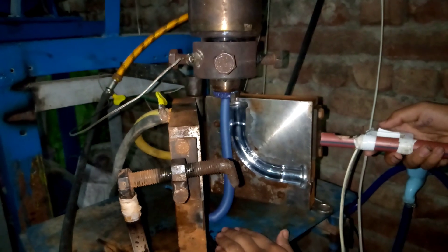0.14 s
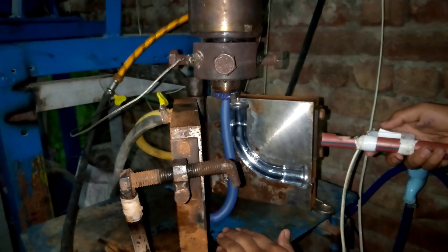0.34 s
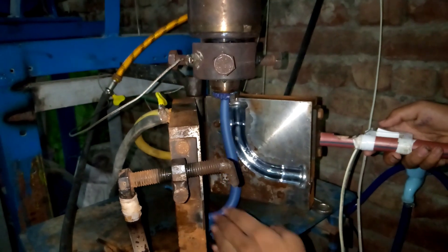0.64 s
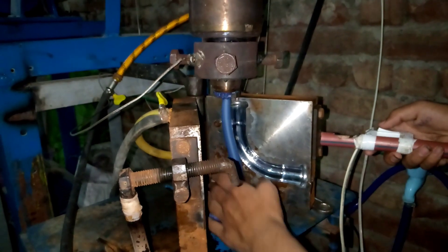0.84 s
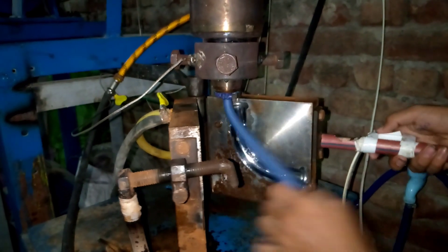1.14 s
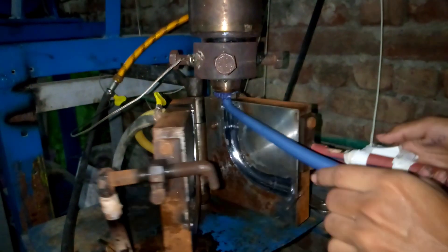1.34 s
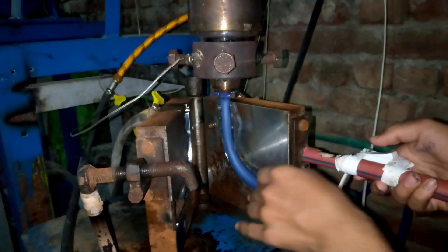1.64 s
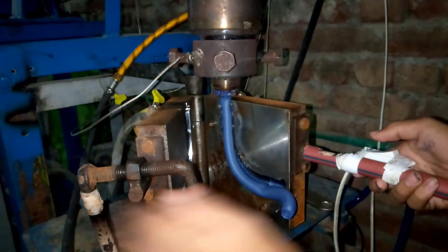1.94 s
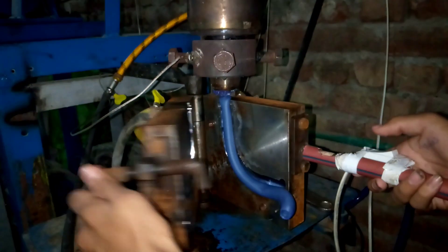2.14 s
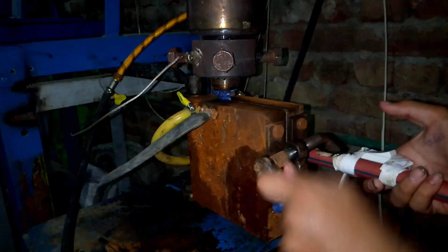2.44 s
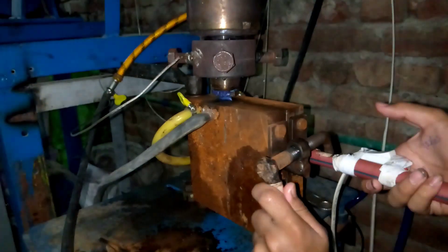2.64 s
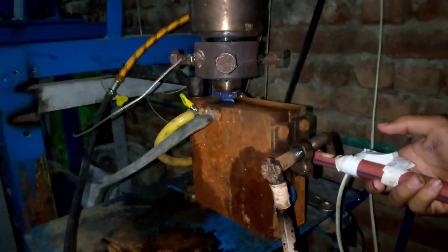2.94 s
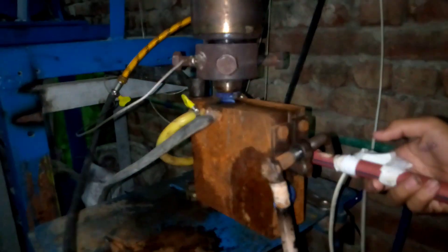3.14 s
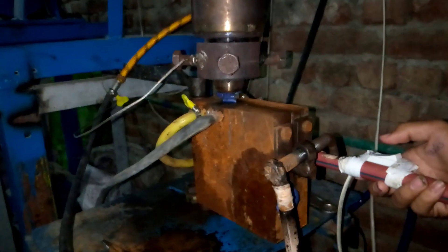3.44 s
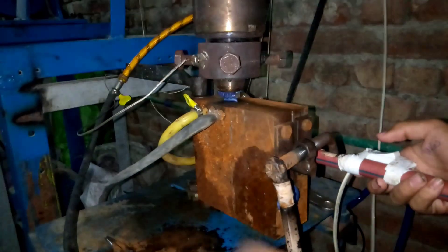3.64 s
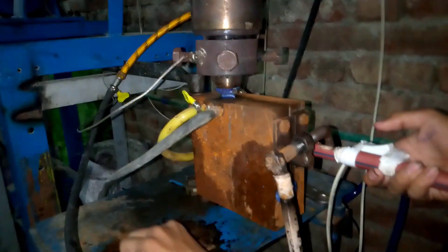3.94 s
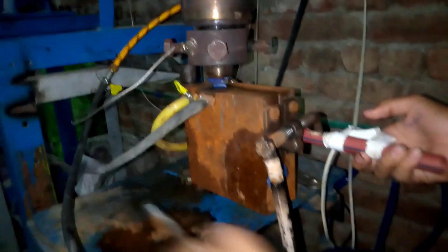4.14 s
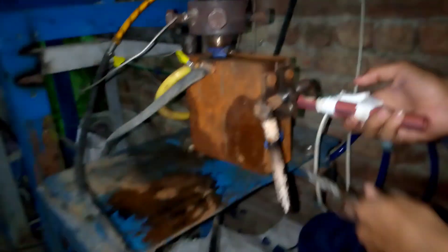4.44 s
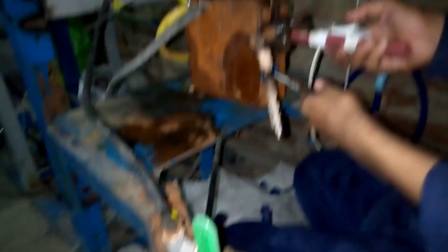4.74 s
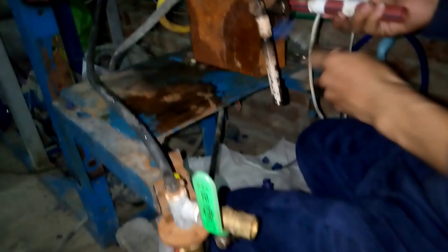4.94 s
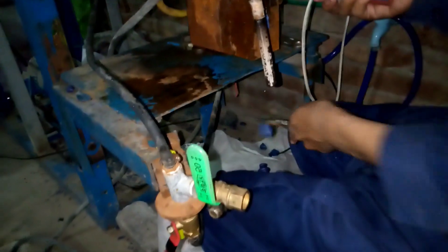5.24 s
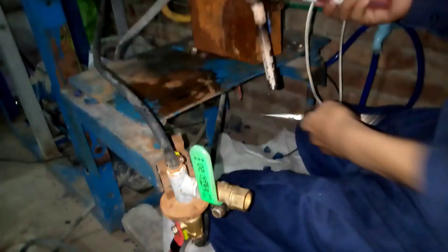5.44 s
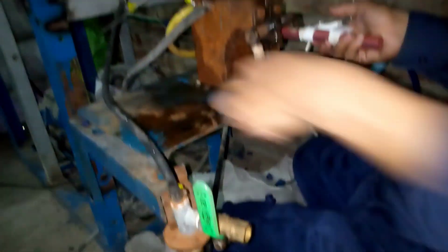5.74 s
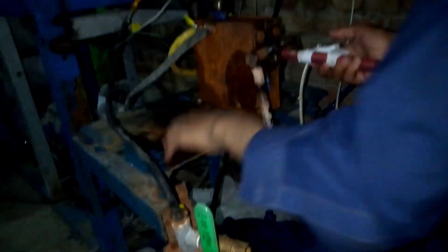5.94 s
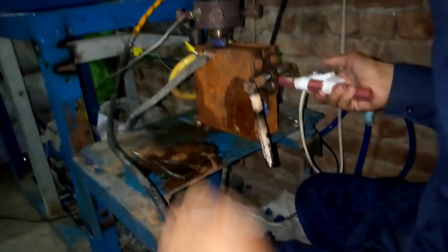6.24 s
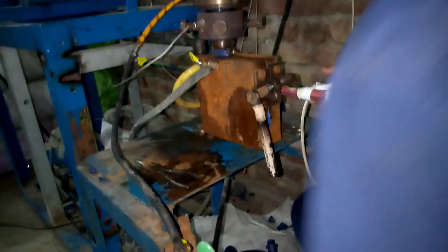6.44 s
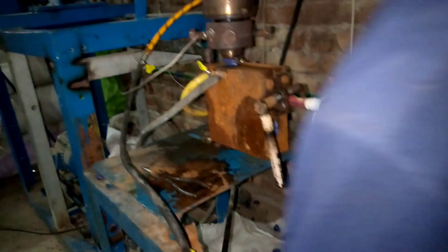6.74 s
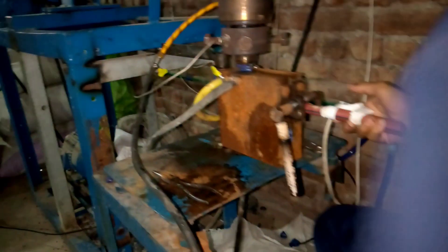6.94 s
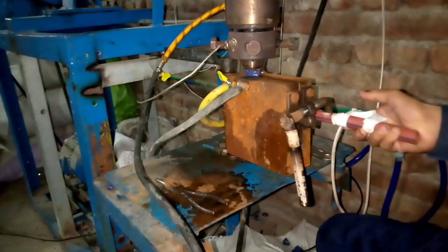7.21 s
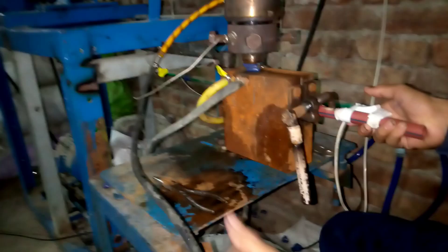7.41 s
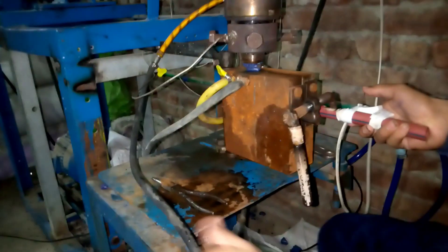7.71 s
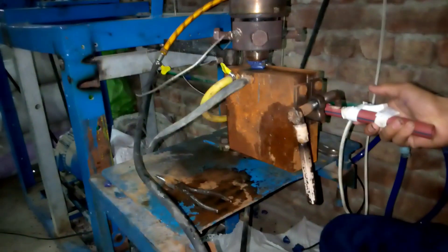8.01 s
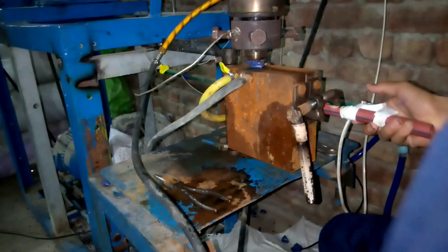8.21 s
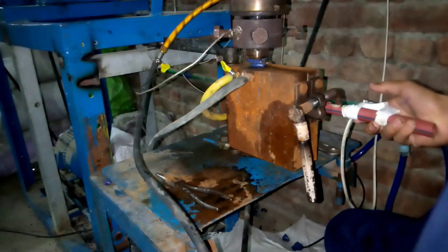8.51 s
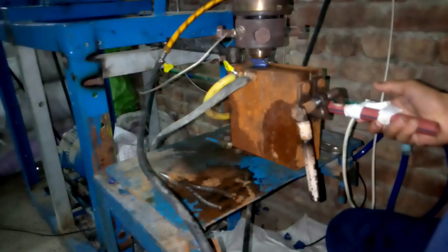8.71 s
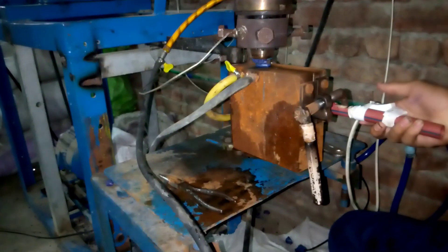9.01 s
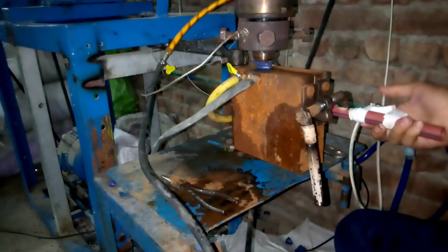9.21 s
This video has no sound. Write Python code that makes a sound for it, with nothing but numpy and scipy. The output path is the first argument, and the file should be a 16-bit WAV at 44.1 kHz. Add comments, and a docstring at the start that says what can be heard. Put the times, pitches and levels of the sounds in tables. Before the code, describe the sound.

Low machine hum and throb, a few clicks, then a sudden bright jet of pressurised air with metal clinks, weakening before one short blast.

```python
"""Compressed air blown into a mould

Compressed air is blown through a hand-held pipe into a closed mould in a small workshop.
A piston compressor (harmonic sum) throbs over a drone (shaped noise). Knocks and metal clinks are damped
sines, ticks are noise bursts. Three short leaks come before the valve opens; the jet is band-filtered noise
with shifting resonances. Moving air pushes the microphone, most of all in a late puff."""
import sys
import numpy as np
from scipy import signal
from scipy.fft import rfft, irfft
from scipy.io import wavfile
from scipy.ndimage import uniform_filter1d, minimum_filter1d

SR = 44100
rng = np.random.default_rng(int(sys.argv[2]) if len(sys.argv) > 2 else 0)


def elevation(decibels):
    """Turn decibel levels (scalar or array-like) into linear amplitude ratios."""
    levels = np.asarray(decibels, float)
    return 10 ** (levels / 20)


def dump_mix(stems):
    """Bounce the given channels to the path in sys.argv[1] as a 16-bit WAV at rate SR."""
    frames = np.atleast_2d(stems).T  # one column per channel
    limited = np.clip(frames, -1, 1)  # hard clip at full scale
    pcm = np.round(limited * 32767).astype(np.int16)
    wavfile.write(sys.argv[1], SR, pcm)


N = 413216


def evened(x):
    """Normalization: scales a signal to an rms of 1."""
    return x / np.sqrt(np.mean(x ** 2) + 1e-20)


def columns(rows):
    """Linear interpolation: joins the rows of a curve, one array of samples for each column after start_s."""
    s, *values = np.transpose(rows)
    return [np.interp(np.arange(N) / SR, s, v) for v in values]


def add(mix, s, sound):
    """Superposition: lays a sound into the mix at s seconds."""
    part = mix[round(s * SR):][:len(sound)]
    part += sound[:len(part)]


def split(x, edges_hz):
    """Complementary filtering: cuts x into soft-edged bands that sum to x."""
    hz = np.fft.rfftfreq(len(x), 1 / SR)
    below = [0] + [1 / (1 + (hz / edge) ** 12) for edge in edges_hz] + [1]
    spectrum = rfft(x)
    return [irfft(spectrum * (high - low), len(x)) for low, high in zip(below, below[1:])]


def noise(spectrum, patchy_db, ripple_db, flicker_db):
    """Random short-time spectra: brief patches, slow narrow ripple from reflections, flicker shared by all bins."""
    frames, hz = N // 256 + 5, np.fft.rfftfreq(1024, 1 / SR)
    real, imag, patches, ripple = rng.standard_normal((frames, 513, 4)).T
    # axis 0 is frequency, axis 1 is time
    patches = uniform_filter1d(uniform_filter1d(patches, size=10, axis=0), size=14, axis=1)
    ripple = uniform_filter1d(uniform_filter1d(ripple, size=3, axis=0), size=130, axis=1)
    flicker = uniform_filter1d(rng.standard_normal(frames), size=5)
    sway_db = patchy_db * evened(patches) + ripple_db * evened(ripple) + flicker_db * evened(flicker)
    curve_hz, curve_db = np.transpose(spectrum)
    colour_db = np.interp(np.log(hz + 1), np.log(curve_hz + 1), curve_db)[:, None]
    z = (real + 1j * imag) * elevation(colour_db + sway_db)
    return evened(signal.istft(z, nperseg=1024, noverlap=768)[1][:N])


def narrow_band(hz, width):
    """Frequency shifting: noise smoothed twice by a one-pole filter is moved up to the curve hz."""
    pole = np.exp(-np.pi * width / SR)
    z = rng.standard_normal(N) + 1j * rng.standard_normal(N)
    for _ in range(2):
        z = signal.lfilter([1], [1, -pole], z)
    carrier = np.exp(2j * np.pi * np.cumsum(hz * np.ones(N)) / SR)
    return evened((z * carrier).real)


def throb(orders, levels_db):
    """Harmonic series of the stroke rate: resonances delay partials, so each stroke rises fast and falls slowly."""
    # resonances of casing and pipes: centre_hz, width_hz
    casing = [(212, 48), (283, 33), (342.6, 6), (377, 33), (676.3, 6), (695.4, 6), (831, 33)]
    strokes_per_s = 17.31
    turns = strokes_per_s * np.arange(N) / SR
    lag_turns = -.026 + .000276 * orders  # higher partials come later in the turn
    delay_rad = sum(np.arctan(2 * (orders * strokes_per_s - hz) / width) for hz, width in casing)
    total = np.zeros(N)
    for order, db, lag, delay in zip(orders, levels_db, lag_turns, delay_rad):
        total += elevation(db) * np.cos(2 * np.pi * order * (turns - lag) - delay)
    return evened(total)


def shop():
    """Superposition of compressor throb and drone, crossfaded in level and colour as the microphone moves."""
    # compressor partials, relative levels: multiple of the stroke rate, first_db, later_db (microphone moved)
    partials = [(7, -66, -68), (8, -67, -70), (9, -67, -73), (10, -65, -80), (11, -57, -69), (12, -64, -70),
                (13, -57, -64), (14, -60, -68), (15, -54, -62), (16, -55, -61), (17, -61, -62),
                (18, -56, -64), (19, -54, -51), (20, -47, -51), (21, -53, -61), (22, -65, -73),
                (23, -68, -76), (25, -63, -74), (26, -66, -76), (31, -67, -74), (33, -66, -69),
                (34, -61, -69), (36, -66, -71), (37, -63, -66), (38, -54, -61), (39, -55, -54),
                (40, -56, -70), (41, -56, -65), (42, -80, -65), (43, -68, -69), (44, -60, -67),
                (45, -66, -73), (47, -65, -71), (48, -62, -70), (55, -59, -74), (57, -68, -72),
                (59, -64, -68), (61, -65, -77), (64, -65, -80), (75, -65, -76), (78, -68, -77),
                (81, -65, -77)]
    # drone spectrum: centre_hz, relative level_db
    drone_colour = [(20, -31), (60, -3.5), (110, -8.5), (220, -5), (340, -15.5), (480, -14), (700, -15),
                    (900, -14.5), (1400, -18), (1800, -20.5), (3300, -21.5), (6700, -20), (8100, -38.5),
                    (11000, -43.5), (13800, -47), (14600, -32), (15800, -42)]
    # bands in the drone: centre_hz, width_hz (each smoothing stage), level_db relative to the shaped noise
    drone_bands = [(2058, 205, -13), (2854, 43, -21.5), (4460, 370, -16), (996, 210, -18.5),
                   (1296, 94, -19)]
    # gains of bass, body and upper part in dB, at the first place and after the move
    first_gains_db = [-47, -44, -44]
    later_gains_db = [-45.5, -41, -40.5]
    # the microphone's move: start_s, end_s
    move_s = (3.64, 4.7)
    orders, first_db, later_db = np.transpose(partials)
    moved = np.interp(np.arange(N) / SR, move_s, [0, 1])
    pump = (1 - moved) * elevation(2.0) * throb(orders, first_db) + moved * elevation(2.5) * throb(orders, later_db)
    drone = noise(drone_colour, patchy_db=0.93, ripple_db=2.0, flicker_db=0.25)
    drone += sum(elevation(db) * narrow_band(hz, width) for hz, width, db in drone_bands)
    bands = split(pump + elevation(3.5 - 0.83 * moved) * drone, [260, 480])
    gains = zip(first_gains_db, later_gains_db, bands)
    return sum(elevation(first + (later - first) * moved) * band for first, later, band in gains)


def ticks():
    """Impact noise: dry broadband bursts in three bands with a common exponential decay."""
    # start_s, middle_db, core_db (hiss band), high_db (treble), t60_s
    bursts = [(1.058, -39, -32.5, -36, .08), (1.071, -40, -40, -55, 0.21), (1.104, -40, -37, -39, 0.041),
              (2.410, -31, -39, -62, 0.021), (2.4945, -48, -23, -54, 0.023), (3.163, -38, -44, -45, .03),
              (3.3052, -16, -5, -10, .008), (3.849, -40, -25, -16, 0.013), (5.943, -22, -11, -28, .05),
              (5.990, -15, 5, -20, 0.026)]
    out, t = np.zeros(N), np.arange(8192) / SR
    for s, middle_db, core_db, high_db, t60 in bursts:
        middle, core, high = map(evened, split(rng.standard_normal(len(t)), [1100, 4000, 7300])[1:])
        high = evened(high + 3 * split(high, [14000])[1])  # the microphone lifts the top band
        burst = elevation(middle_db) * middle + elevation(core_db) * core + elevation(high_db) * high
        add(out, s, burst * elevation(-60 * t / t60) * np.minimum(t / 0.0018, 1))
    return out


def knocks():
    """Damped oscillator: each thump or short knock, low or high, is one exponentially decaying sine."""
    # start_s, level_db (undamped amplitude), pitch_hz, t60_s
    knock_notes = [(1.060, -26.5, 840, .03), (1.066, -33, 225, 0.23), (1.077, -28, 343, 0.04),
                   (1.105, -23, 2150, 0.01), (1.105, -38, 245, 0.058), (2.409, -30, 1280, 0.018),
                   (3.413, -21, 290, .02), (3.345, -27, 250, 0.018), (5.091, -33, 220, .1),
                   (5.109, -26.5, 200, 0.13), (5.99, -16, 150, 0.018)]
    out, t = np.zeros(N), np.arange(8192) / SR
    for s, level_db, hz, t60 in knock_notes:
        add(out, s, elevation(level_db - 60 * t / t60) * np.sin(2 * np.pi * hz * t))
    return out


def clinks():
    """Modal ringing: struck metal sounds its damped modes; a held part rings shorter, a smaller one higher."""
    # modes of a freely ringing part: pitch_hz, relative level_db, t60_s
    modes = [(1766, -21, .3), (2751, -24, .1), (3400, -17, .07), (4269, -9, .18), (4942, 0, .3),
             (5400, -9, .15), (6492, -4, .05)]
    # start_s, level_db (added to the modes), share of the free ring time, pitch factor
    strikes = [(2.4946, -29, 0.1, .99), (5.946, -12, .6, 1.075), (5.9915, -6, 0.75, 1.0)]
    out, t = np.zeros(N), np.arange(SR // 3) / SR
    for s, level_db, free, pitch in strikes:
        ring = np.zeros(len(t))
        for hz, db, t60 in modes:
            ring += elevation(db - 60 * t / (t60 * free)) * np.sin(2 * np.pi * hz * pitch * t)
        add(out, s, elevation(level_db) * ring * np.minimum(t / .0012, 1))
    return out


def spurts():
    """Pressure release: each burst rises, sags while held and ends quickly; returns core and top-band levels."""
    # three leaks before the valve opens, then a late puff:
    # start_s, rise_s, hold_s, peak_db, top_db (top band above the peak)
    bursts = [(3.055, 0.01, 0.0028, -42.5, -2), (3.121, 0.018, 0.02, -41, -2),
              (3.159, 0.0073, .003, -36.5, -8), (7.516, 0.037, .1, -5.5, -2)]
    sag_db_per_s, release_s = 94, .015
    t, total = np.arange(N) / SR, np.zeros((2, N))
    for s, rise, hold, db, top_db in bursts:
        times = [0, rise, rise + hold, rise + hold + release_s]
        pressure = np.interp(t - s, times, [0, 1, elevation(-sag_db_per_s * hold), 0])
        total += pressure * elevation(np.array([[db], [db + top_db]]))
    return total


def whistles():
    """Resonance of pipe and gap: narrow noise bands, some steady and some swelling, drift slowly in pitch."""
    # steady bands: centre_hz, width_hz (each smoothing stage), level_db relative to the jet
    resting = [(3288, 130, -38), (4577, 650, -20), (5455, 420, -14.5), (5910, 380, -14.5), (6480, 280, -13)]
    # bands that stand out for a while: start_s, end_s, centre_hz, width_hz, level_db relative to the jet
    swells = [(3.123, 4.087, 6550, 222, 0), (3.9, 4.9, 6560, 350, -7), (4.2, 8.103, 4630, 453, -13),
              (3.7, 4.697, 5410, 450, -5.5), (4.4, 6.7, 3288, 199, -24.5), (4.654, 5.6, 5910, 300, -12.5),
              (6.055, 7.105, 5357, 300, -4.5), (8.103, 9.323, 4495, 596, -10), (8.6, 9.3, 5460, 300, -10)]
    fade_s, drift = 0.17, .005  # drift: standard deviation, as a share of the pitch, of the points 0.5 s apart
    t = np.arange(N) / SR

    def drifting(hz):
        """Slow frequency modulation along a random curve."""
        return hz * (1 + drift * np.interp(t, np.arange(0, 10, .5), rng.standard_normal(20)))

    out = sum(elevation(db) * narrow_band(drifting(hz), width) for hz, width, db in resting)
    for start, end, hz, width, db in swells:
        fade = np.clip(np.minimum(t - start, end - t) / fade_s, 0, 1)
        out += elevation(db) * fade * narrow_band(drifting(hz), width)
    return out


def jet():
    """Turbulence noise: hiss in five bands plus whistles, modulated by uneven flow; spurts add power to the hiss."""
    # the flow from the opening of the valve on: start_s, level_db
    flow = [(3.2035, -20), (3.218, -19), (3.228, -12), (3.28, -9), (3.8, -10.5), (4.05, -11.5),
            (4.4, -11.5), (5.45, -12), (5.72, -11), (6.04, -13), (6.2, -12.5), (7.02, -12.5), (7.12, -19.5),
            (7.41, -16), (7.62, -15), (7.68, -19.5), (7.74, -21), (7.85, -23), (7.95, -20), (8.1, -26),
            (8.17, -19), (9.27, -18.5), (9.31, -26.5)]
    # hiss spectrum: centre_hz, relative level_db
    hiss_colour = [(800, -36.5), (1500, -30), (2800, -24), (3800, -12.5), (4600, -1), (5400, 4),
                   (6700, 4.5), (7400, -9), (8200, -21.5), (10500, -19.5), (12000, -21.5), (13800, -17),
                   (14500, -8), (15200, -0.5), (15800, -14)]
    # bands beside the core: start_s, flank_db (lower flank), treble_db (middle treble), top_db
    side_bands = [(3.2035, -38, -33, -16), (3.235, -22.5, -9, -17), (3.3, -29.5, -16, -27),
                  (4.4, -32, -22.5, -21.5), (6.0, -30, -28.5, -18.5), (6.9, -36, -31.5, -16.5),
                  (7.8, -35, -35, -18), (9.37, -36.5, -33.5, -16.5)]
    # band just under the core: start_s, level_db relative to the jet
    shoulder_curve = [(3.2, -17), (3.9, -19), (4.6, -13.5), (6.0, -15), (7.0, -13), (9.37, -8)]
    # spurt levels relative to the spurt's core: flank_db, shoulder_db, treble_db
    spurt_bands_db = [-10.5, -7, -13]
    flowing = np.arange(N) / SR > flow[0][0]
    level = flowing * elevation(columns(flow)[0])
    flank, treble, top = (flowing * elevation(db) for db in columns(side_bands))
    steady = [flank, level * elevation(columns(shoulder_curve)[0]), level * elevation(-6.5), treble, top]
    burst, burst_top = spurts()
    burst_flank, burst_shoulder, burst_treble = (burst * elevation(db) for db in spurt_bands_db)
    bursts = [burst_flank, burst_shoulder, burst, burst_treble, burst_top]
    hiss = noise(hiss_colour, patchy_db=1.47, ripple_db=2.0, flicker_db=0.94)
    bands = map(evened, split(hiss, [3786, 5010, 7790, 13600]))
    broad = sum(np.hypot(a, b) * band for a, b, band in zip(steady, bursts, bands))
    flutter = evened(uniform_filter1d(rng.standard_normal(N), size=150))  # eddies of a few ms
    sputter = evened(uniform_filter1d(rng.standard_normal(N), size=1200))  # the flow is uneven over some 30 ms
    return elevation(0.23 * flutter + 0.64 * sputter) * (broad + level * whistles())


def buffets():
    """Heavily damped pressure pulse: moving air gives the microphone a sharp push and a slower swing back."""
    # start_s, level_db, pitch_hz, sign of the push
    pushes = [(3.306, -11.5, 450, 1), (7.544, -11, 300, -1), (7.552, -5, 300, 1), (7.555, -10, 109, -1),
              (7.568, -11, 160, -1), (7.578, -7.5, 109, -1)]
    out, t = np.zeros(N), np.arange(2000) / SR
    for s, level_db, hz, sign in pushes:
        push = np.cos(2 * np.pi * hz * t) * np.exp(-2.5 * hz * t) * np.minimum(t / 0.0003, 1)
        add(out, s, sign * elevation(level_db) * push)
    return out


def squeezed(x):
    """Dynamic compression: gain looks ahead, sinks above a knee, holds briefly and recovers at a steady rate."""
    knee_db, squeeze, recovery_db_per_s = -25, .58, 300  # squeeze: dB of gain lost per dB above the knee
    ahead_s, hold_s = 0.011, 0.029
    power_db = 10 * np.log10(abs(uniform_filter1d((x ** 2).mean(0), size=700)) + 1e-12)
    ahead, span = round(ahead_s * SR), round((ahead_s + hold_s) * SR)
    # running maximum, shifted to reach from the hold time back to the look-ahead
    padded_db = np.pad(power_db, span, "edge")
    held_db = -minimum_filter1d(-padded_db, size=span)[span + ahead - span // 2:][:N]
    fall_db = np.arange(N) * recovery_db_per_s / SR
    recovering_db = np.maximum.accumulate(held_db + fall_db) - fall_db
    over_db = np.maximum(recovering_db - knee_db, 0)
    return x * elevation(-squeeze * uniform_filter1d(over_db, size=300))


def scene():
    """Superposition: all sources reach one microphone, copied to both channels."""
    mono = shop() + ticks() + knocks() + clinks() + jet() + buffets()
    return np.array([mono, mono])


def band_limit(x):
    """A steep low-pass at the top of the band."""
    return signal.sosfilt(signal.butter(12, 17100, fs=SR, output="sos"), x)


def record(dry):
    """Band limiting and gain control: the microphone drops deep bass, the recorder tames loud sound and cuts the top."""
    bass_cut = signal.butter(2, 55, "high", fs=SR, output="sos")
    controlled = squeezed(signal.sosfilt(bass_cut, dry))
    top_cut = signal.firwin(1023, 15820, window=("kaiser", 9), fs=SR)  # low-pass edge in Hz
    finished = signal.oaconvolve(controlled, top_cut[None], "same")
    return band_limit(finished)


dry = scene()
out = record(dry)
dump_mix(out)
```